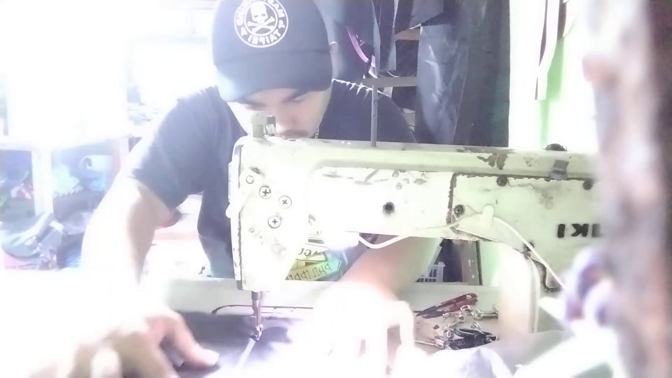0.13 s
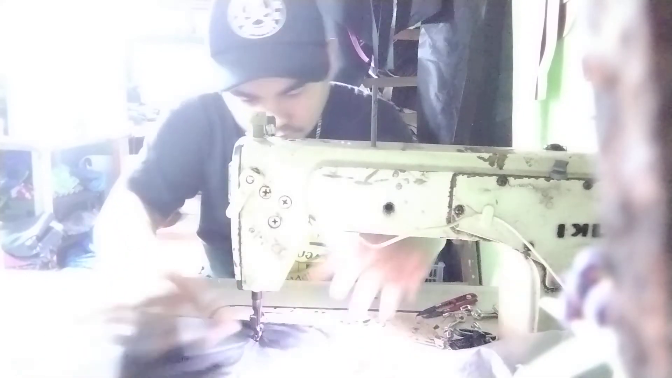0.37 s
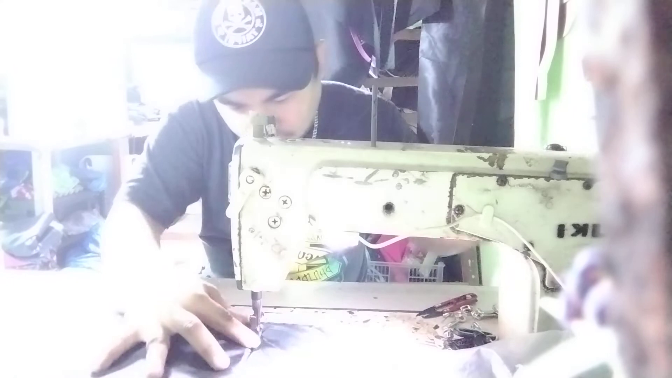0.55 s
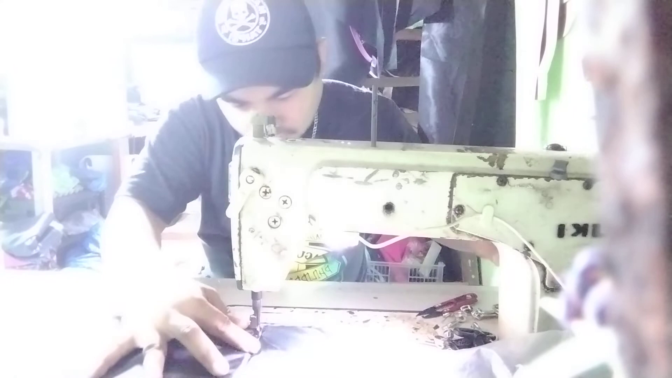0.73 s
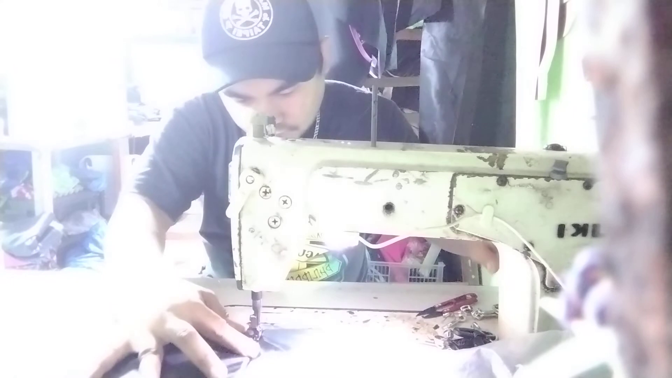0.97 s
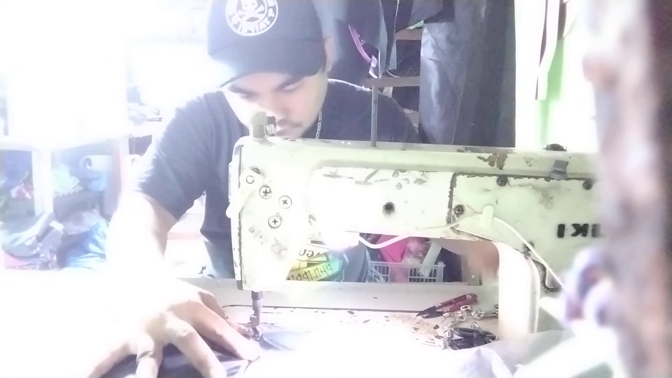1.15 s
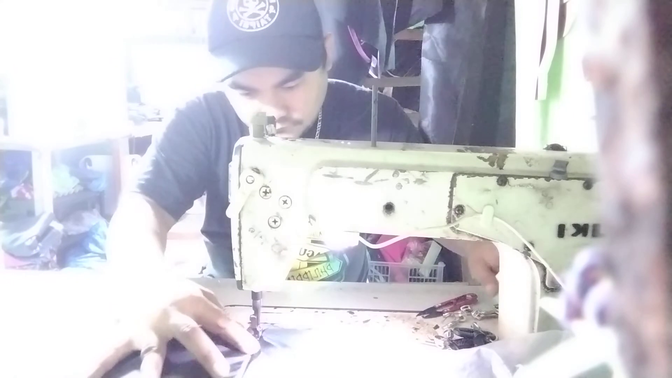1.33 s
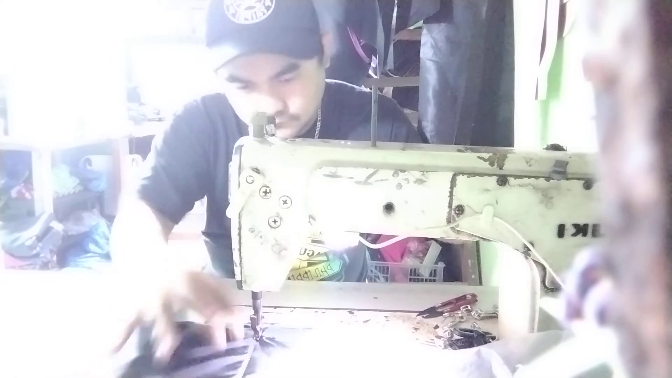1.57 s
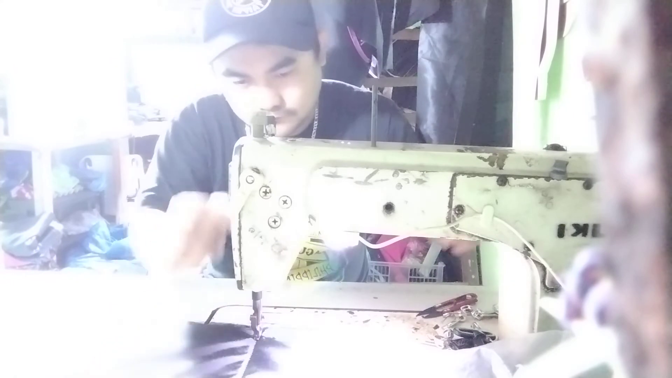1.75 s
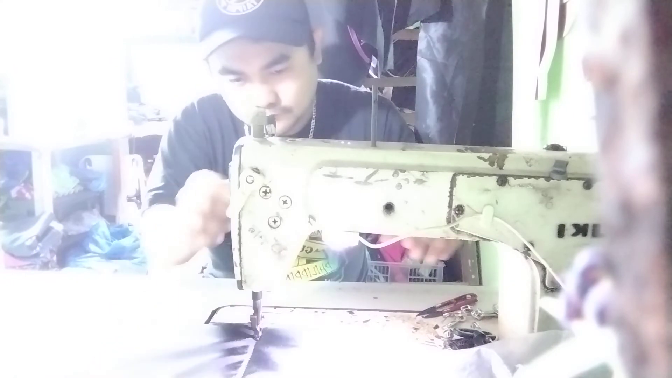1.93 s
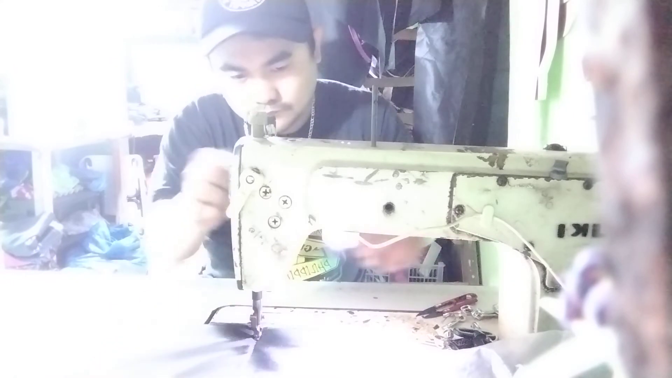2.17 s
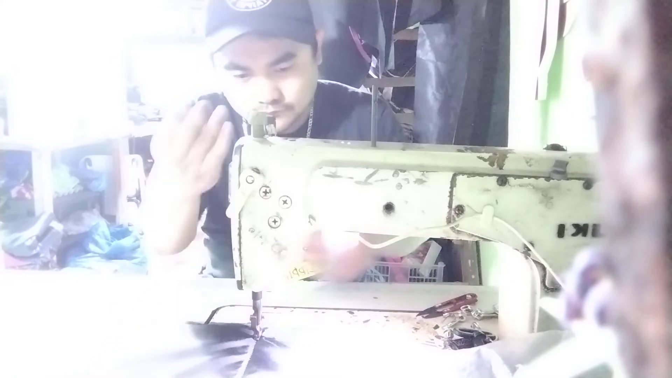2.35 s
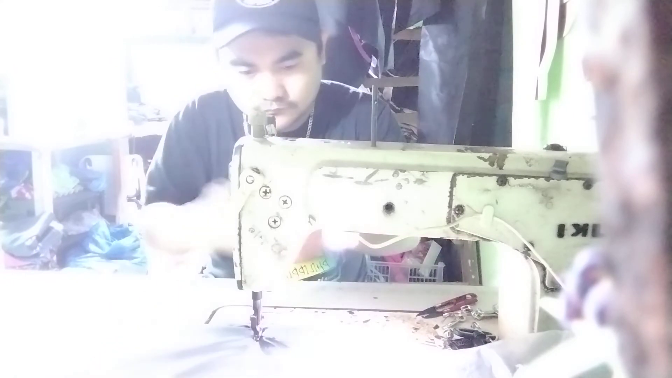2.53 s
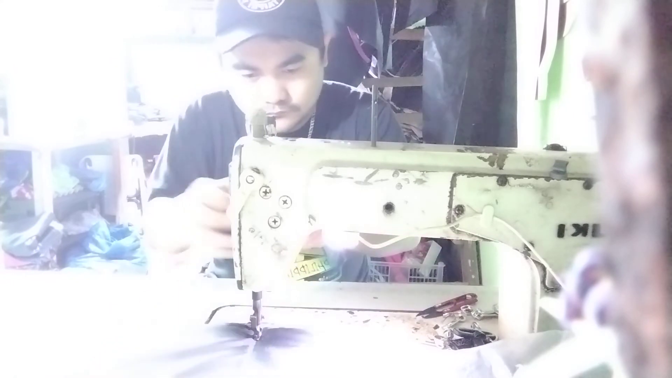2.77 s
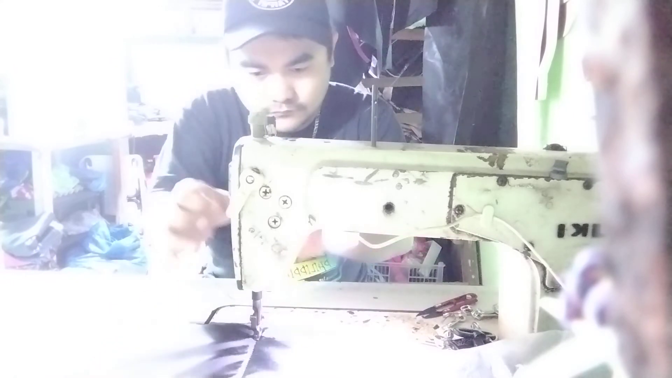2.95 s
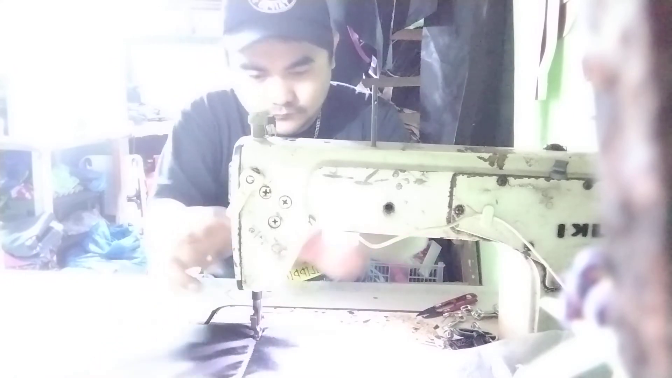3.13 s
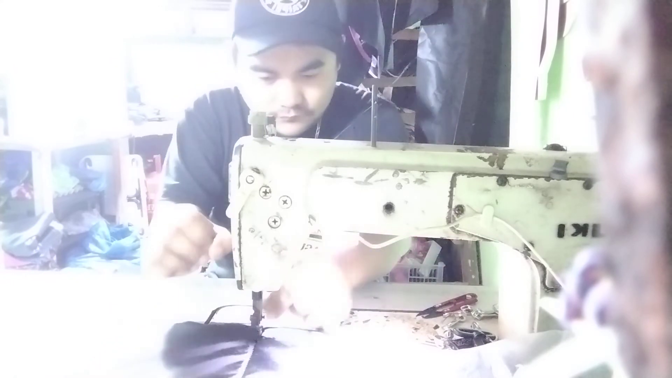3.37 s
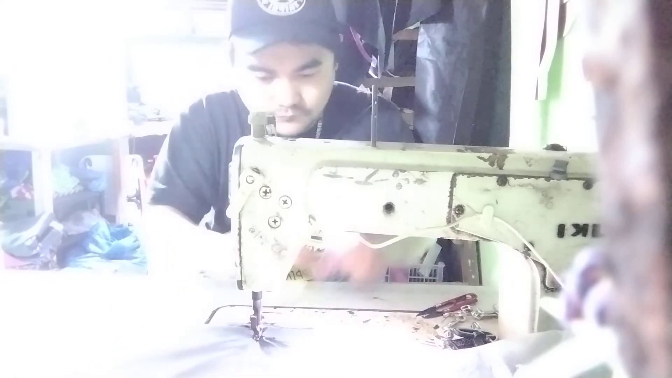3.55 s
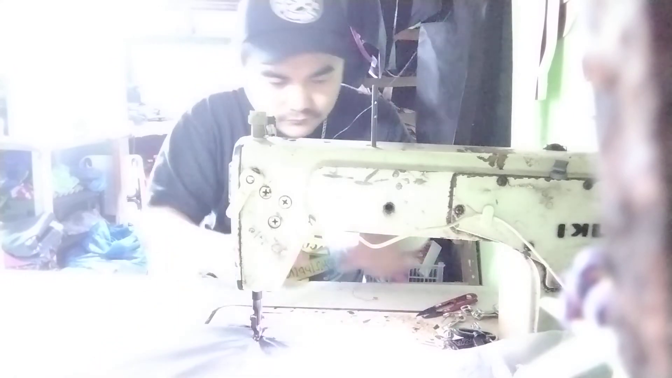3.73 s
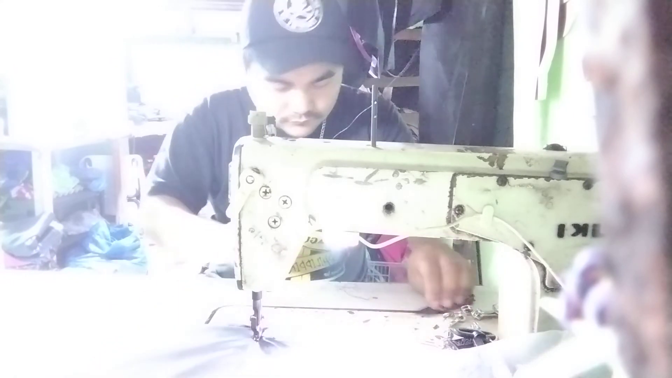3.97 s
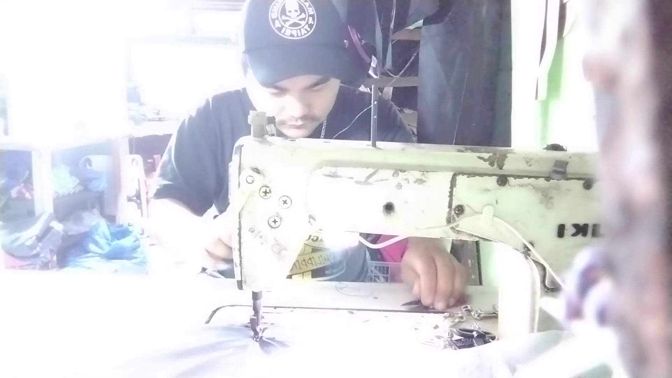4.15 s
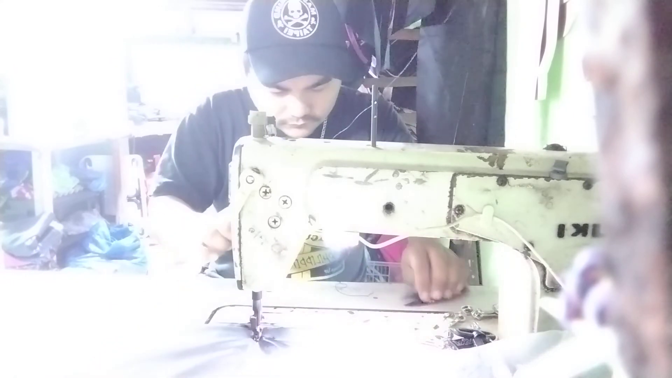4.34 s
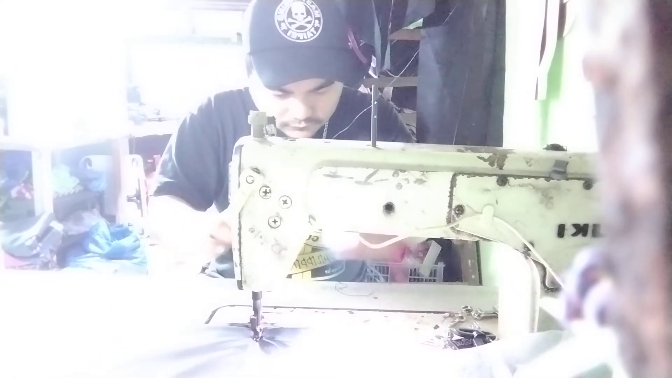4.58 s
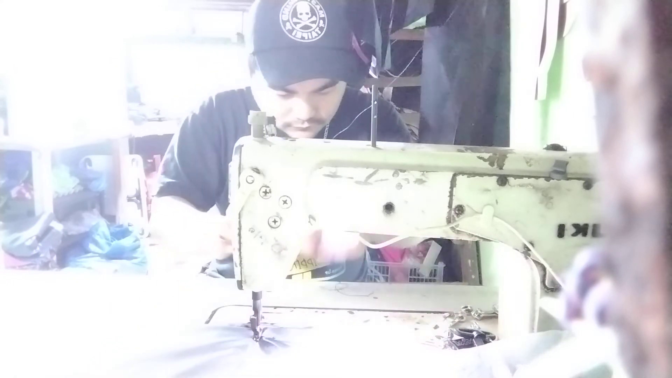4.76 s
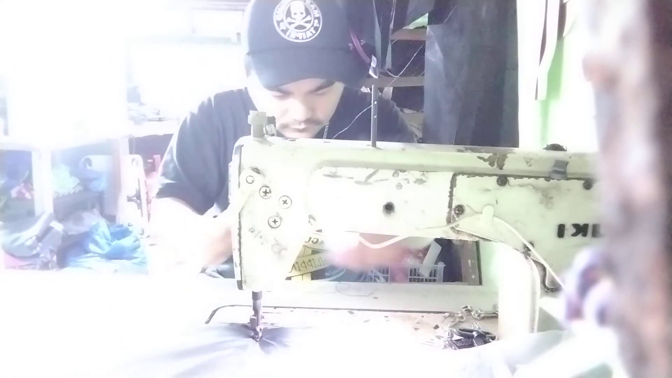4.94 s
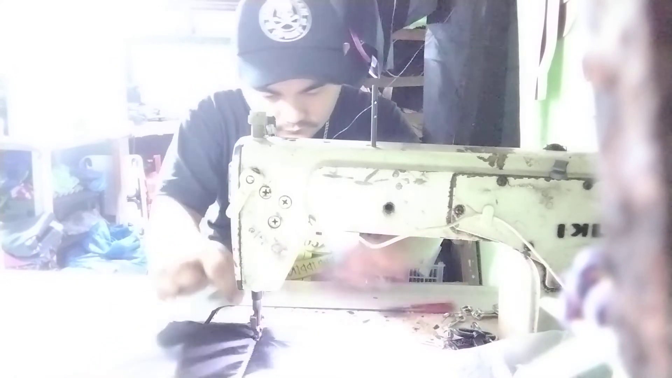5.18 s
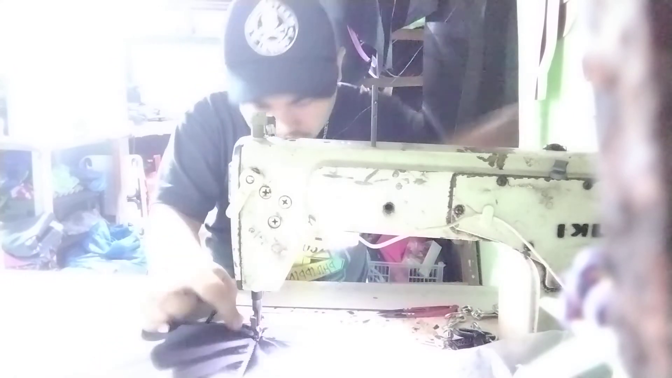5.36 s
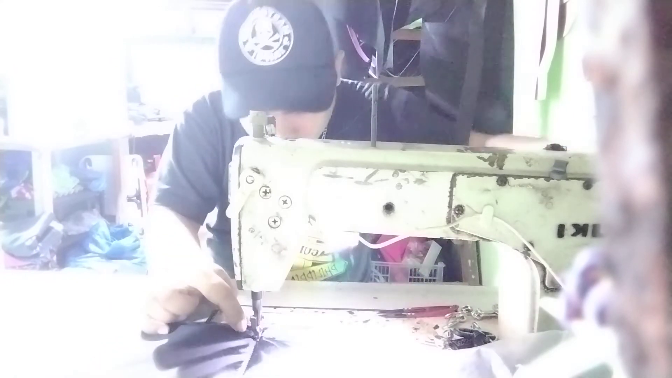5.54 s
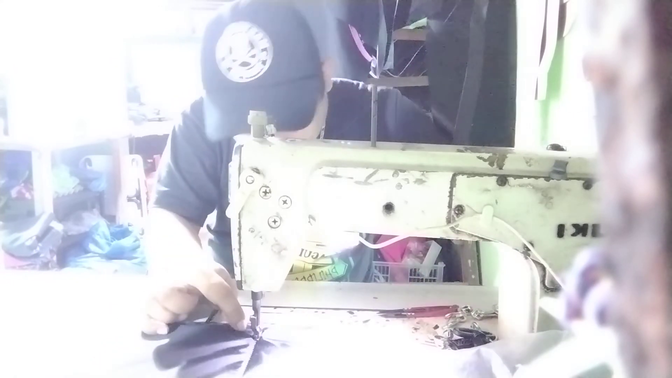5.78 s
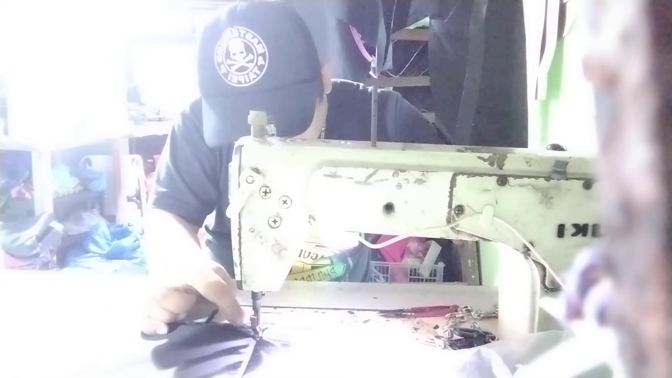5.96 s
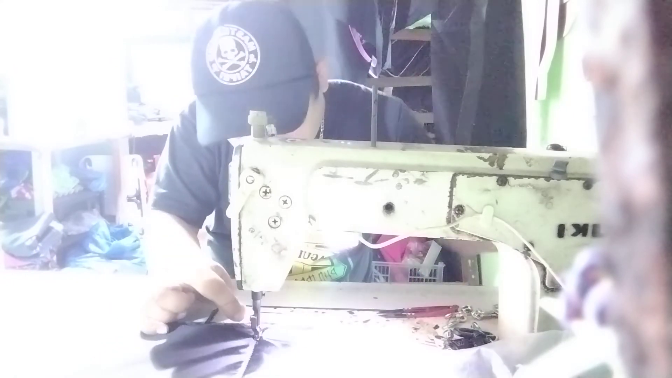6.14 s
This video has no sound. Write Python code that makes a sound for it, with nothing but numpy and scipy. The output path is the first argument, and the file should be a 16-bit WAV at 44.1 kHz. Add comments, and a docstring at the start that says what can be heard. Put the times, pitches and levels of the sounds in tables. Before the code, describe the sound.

A close, mono sound in a small, lightly reverberant workshop. From 0 to 0.2 s an industrial sewing machine runs flat out, about fifty stitches a second, a loud hard metallic buzz over table rumble. It brakes and stops at 0.5 s. After a tiny gap, clacks at 0.69 and 0.76 lead into a slower run, peaking near 0.9 at about half speed, then decelerating into separate ticks and stopping at 1.5, with small lever clacks and a thin fading ring. Then it is quiet: low motor hum, whirr and thin hiss. A faint steady whine lasts from 2 to 5 s, with stronger whines around 2.8-3.1 and 3.4. A paired clack falls at 2.9. Faint blips and cloth rustles follow, clearer at 4.1-4.3 and 4.9. A bright sharp clack comes at 5.2, then rustles at 5.4 and 6.1, a tiny click at 5.67 and soft bumps around 6 s.

```python
"""Industrial sewing machine in a small workshop

A fast run of stitches brakes, a slower run follows and stops: periodic impacts ring the cast head and table,
the swinging linkage adds shaft harmonics, and a thin ring is heard as the shaft comes to rest.
Presser foot and levers clack, short bumps and faint blips sound and the work rustles: shaped noise.
The clutch motor idles throughout as sines and filtered noise, over shaped noise for air and hiss.
"""
import sys
import numpy as np
from scipy import signal
from scipy.fft import rfft, irfft, next_fast_len
from scipy.io import wavfile
from scipy.ndimage import uniform_filter1d, map_coordinates

SR = 44100
rng = np.random.default_rng(int(sys.argv[2]) if len(sys.argv) > 2 else 0)


def file_out(sig):
    """Save sig as 16-bit WAV at sys.argv[1]."""
    # one column per channel
    cols = np.atleast_2d(sig).T
    # limit, then scale
    lim = np.clip(cols, -1, 1)
    pcm = np.round(lim * 32767).astype(np.int16)
    wavfile.write(sys.argv[1], SR, pcm)


N = 273420  # length [samples]

# rotation of the main shaft: (time [s], speed [stitches per second])
SHAFT_SPEED = [(0, 53.9), (.21, 53.9), (.285, 47), (.36, 33), (.41, 17), (.5, 0), (.634, 0), (.694, 17),
               (.81, 28.5), (.88, 29.3), (1.06, 23), (1.2, 17), (1.4, 6), (1.5, 0)]


def amp(db):
    """Level definition: decibels to amplitude gain."""
    return 10 ** (np.asarray(db) / 20)


def unit(x):
    """Power normalisation: scale to rms 1."""
    return x / np.sqrt(np.mean(x ** 2) + 1e-20)


def along(points, hz):
    """Logarithmic frequency scale: interpolate (frequency [Hz], value) points on it."""
    f, value = np.transpose(points)
    return np.interp(np.log(hz + 1), np.log(f + 1), value)


def curve(rows):
    """Linear interpolation: (time [s], value) rows become one value per sample."""
    s, value = np.transpose(rows)
    return np.interp(np.arange(N) / SR, s, value)


def wobble(rate):
    """Band-limited fluctuation: a smooth random curve through normal knots, rate of them a second."""
    knots = rng.standard_normal(int(N * rate / SR) + 4)
    return map_coordinates(knots, [np.arange(N) * rate / SR])


def coloured(x, gain):
    """Minimum-phase filtering: folding the cepstrum makes a causal filter of the given gain."""
    size = 2 * next_fast_len(len(x) // 2 + 2048)
    hz = np.fft.rfftfreq(size, 1 / SR)
    cepstrum = irfft(np.log(np.maximum(gain(hz), 1e-6)), size)
    cepstrum[1:size // 2] *= 2
    cepstrum[size // 2 + 1:] = 0
    response = np.exp(rfft(cepstrum))
    return irfft(rfft(x, size) * response, size)[:len(x)]


def resonances(modes, hz):
    """Modal superposition: power sum of (centre [Hz], half-power width [Hz], level [dB]) resonances."""
    return np.sqrt(sum(amp(db) ** 2 / (1 + ((hz - centre) / (width / 2)) ** 2) for centre, width, db in modes))


def noise(spectrum):
    """Spectral shaping: noise of rms 1 with a (frequency [Hz], level [dB]) spectrum."""
    return unit(coloured(rng.standard_normal(N), lambda hz: amp(along(spectrum, hz))))


def strike(gain, rise, t60):
    """Impact excitation: a noise burst (rise constant and t60 in s) filtered by gain, near rms 1 at its height."""
    t = np.arange(SR // 2) / SR
    shape = (1 - np.exp(-t / max(rise, 1e-4))) ** 2 * amp(-60 * t / t60)
    ring = coloured(rng.standard_normal(len(t)) * shape, gain)
    return unit(ring) * np.sqrt(np.mean(shape ** 2)) / shape.max()


def add(track, s, sound):
    """Linear superposition: mix a sound into the track at s seconds."""
    part = track[round(s * SR):][:len(sound)]
    part += sound[:len(part)]


def swell(start, end, db, attack, t60):
    """Growth and decay: gain that rises to db at start, holds until end and dies away exponentially."""
    t = np.arange(N) / SR
    growth = np.exp(-(np.minimum(t - start, 0) / attack) ** 2)
    return amp(db - 60 * np.maximum(t - end, 0) / t60) * growth


def room(x, wet_db):
    """Reverberation: convolution with exponentially decaying noise whose decay time depends on frequency."""
    # decay of the workshop: (frequency [Hz], t60 [s])
    decay_times = [(150, 0.52), (1500, 0.42), (4000, 0.24), (12000, 0.24)]
    hz, _, z = signal.stft(rng.standard_normal(SR // 2), SR, nperseg=256)
    t = np.linspace(0, .5, z.shape[1])
    decay = amp(-60 * t / along(decay_times, hz)[:, None])
    tail = signal.istft(z * decay, SR, nperseg=256)[1]
    tail /= np.linalg.norm(tail)
    return x + amp(wet_db) * signal.fftconvolve(x, tail)[:N]


def effort(speed):
    """Load dependence: gains [dB] of clatter and rumble grow with speed, thick work and braking."""
    # the needle labours where the work is thick: (start [s], end [s], extra clatter [dB])
    thick_work = [(0.313, .335, 5), (0.805, 0.881, 3), (1.054, 1.1, 2)]
    thick_edge_s = 0.014
    # gain at full speed, and its loss each time the speed halves
    steel_db, steel_halving_db = -20.5, 9
    rumble_db, rumble_halving_db = -31.5, 10
    brake_db, brake_rate = 11, 215  # limit of the change [dB], its scale [stitches per second, per second]
    t = np.arange(N) / SR
    halvings = -np.log2(np.maximum(speed / speed.max(), .01))
    load_db = sum(db * np.exp(-((t - np.clip(t, start, end)) / thick_edge_s) ** 2)
                  for start, end, db in thick_work)
    acceleration = uniform_filter1d(np.gradient(speed) * SR, size=2048)
    braking = -np.tanh(acceleration / brake_rate)  # negative, so quieter, while speeding up
    clatter_db = steel_db - steel_halving_db * halvings + load_db
    return clatter_db, rumble_db - rumble_halving_db * halvings + brake_db * braking


def stitching(ring_t60=0.03, ring_rise=0.00037, rattle_turn=0.34, rattle_db=-1.5, scatter_db=2.63,
              modes_db=8, table_t60=0.12, belt_db=-3, bearing_db=-14, low_hz=85, jitter_s=.00009):
    """Periodic impact excitation: each shaft turn repeats steel contacts that ring head and table."""
    # needle bar, hook, feed dog, take-up lever: (phase [share of a turn], level [dB])
    contacts = [(.63, -5.5), (.8, -11.5), (0.13, -13), (0.31, -13.5)]
    # cast-iron head: (frequency [Hz], gain [dB])
    head_gain = [(200, -25.5), (350, -1.5), (550, -3.5), (690, -8), (900, -1.5), (1150, -6.5), (1330, 0),
                 (1600, -7.5), (1900, 1), (2350, -10), (3300, -11), (5600, -26.5), (9900, -18),
                 (15000, -38.5)]
    # ringing of the head: (centre [Hz], width [Hz], level before modes_db [dB])
    head_modes = [(1330, 180, -5.5), (1564, 95, 2), (1850, 360, -17), (2500, 37, -4), (2950, 340, -5.5)]
    # table top: (frequency [Hz], gain before the low cut [dB])
    table_gain = [(24, -43), (40, -37), (54, -2.5), (97, 2.5), (172, 3.5), (222, -8.5), (358, -2),
                  (418, -14), (460, -3), (700, -5), (910, -19), (1540, -120)]
    speed = curve(SHAFT_SPEED)
    clatter_db, rumble_db = effort(speed)
    turns = np.cumsum(speed) / SR
    pace, running = speed / speed.max(), np.tanh(speed / 5)
    t = np.arange(SR // 4) / SR
    head_decay = (1 - np.exp(-t / ring_rise)) * amp(-60 * t / ring_t60)
    table_decay = amp(-60 * t / table_t60)
    steel, wood, play = np.zeros((3, N))
    for share, db in contacts:
        at = np.flatnonzero(np.diff(np.floor(turns - share)))
        shift = np.round(jitter_s * SR * rng.standard_normal(len(at))).astype(int)  # bearing play
        at = np.clip(at + shift, 0, N - 1)
        blows = np.zeros(N)
        blows[at] = amp(db + scatter_db * rng.standard_normal(len(at)))
        head_ring = rng.standard_normal(len(t)) * head_decay
        table_ring = rng.standard_normal(len(t)) * table_decay
        steel += signal.fftconvolve(blows * np.sqrt(pace), head_ring)[:N]
        wood += signal.fftconvolve(blows / np.sqrt(speed + 10), table_ring)[:N]
        play += amp(db) * np.exp(-((turns - share) % 1) / rattle_turn)
    # loose joints rattle after each contact, dying away over a share of the turn
    rattle = amp(rattle_db) * unit(running * play * rng.standard_normal(N))
    # bearings and belt rub for as long as the shaft turns
    bearings = amp(bearing_db) * unit(running * rng.standard_normal(N))
    belt = amp(belt_db) * unit(running * rng.standard_normal(N))

    def head(hz):
        return amp(along(head_gain, hz)) * (1 + amp(modes_db) * resonances(head_modes, hz))

    def table(hz):
        return amp(along(table_gain, hz)) / (1 + (low_hz / (hz + 1)) ** 4)

    steel = coloured(unit(steel) + rattle + bearings, head)
    wood = coloured(unit(wood) + belt, table)
    clatter = room(amp(clatter_db) * unit(steel), wet_db=-9.5)
    rumble = room(amp(rumble_db) * unit(wood), wet_db=-5)
    return np.sqrt(np.mean(running ** 2)) * (clatter + rumble)


def linkage(steepness=6):
    """Unbalanced rotation: the linkage shakes the frame at shaft multiples, fading fast as speed drops."""
    # harmonics of the shaft: (multiple of its rate, mean level at full speed [dB])
    harmonics = [(2, -37.5), (6, -31.5), (7, -54), (8, -45), (9, -47), (10, -31), (14, -41), (17, -41),
                 (19, -41)]
    speed = curve(SHAFT_SPEED)
    turns = np.cumsum(speed) / SR
    tones = sum(amp(db + wobble(33)) * np.sin(2 * np.pi * (k * turns + rng.random())) for k, db in harmonics)
    return np.sqrt(2) * tones * (speed / speed.max()) ** steepness


def run_down(attack_s=.14, t60=0.82):
    """Narrow-band resonance: a thin metallic ring of steadied envelope hangs on as the shaft comes to rest."""
    # resonances, whose gain is squared below: (centre [Hz], width [Hz], level [dB])
    ring_modes = [(1003, 34, 11.5), (1803, 78, 4.5), (1926, 27, 5)]
    # full strength: (start [s], end [s], level [dB])
    ring_swell = (1.07, 1.63, -47)
    ring = coloured(rng.standard_normal(N), lambda hz: resonances(ring_modes, hz) ** 2)
    power = np.abs(uniform_filter1d(ring ** 2, size=2048))
    steadied = ring / np.sqrt(power + 1e-12)
    return swell(*ring_swell, attack_s, t60) * steadied


def clacks(ring_db=-9, thud_db=-15.0, click_db=-16, bright_db=3, dull_db=3, modes_db=6,
           click_life=0.39, thud_life=1.02, thud_top_hz=1400):
    """Contact stiffness: steel stops click, ring the presser bar and thud; quicker contacts are brighter."""
    # presser foot and levers: (time [s], level before the gains of the parts [dB], rise constant [s], t60 [s])
    stops = [(.686, -23.5, 0.00277, .06), (.7624, -13, 0.00033, 0.014), (.851, -24, 0.00072, .08),
             (1.5, -34.5, .001, 0.076), (1.535, -31.5, .001, 0.063), (1.586, -24, 0.0011, 0.048),
             (2.87, -23.5, .0027, .13), (2.886, -23, 0.00251, 0.11), (2.996, -38, .005, 0.034),
             (5.171, -21.5, 0.00072, 0.019), (5.198, -12.5, 0.00043, 0.051), (5.218, -23, .00012, .025),
             (5.277, -25.5, .001, 0.085)]
    # presser foot: (frequency [Hz], gain [dB])
    foot_gain = [(150, -60), (250, -13), (466, 5.5), (705, 7), (1050, 6.5), (1180, 5.5), (1530, 2.5),
                 (2130, 2.5), (2660, -1), (2950, 1.5), (3630, -12), (4960, -13), (5890, -12), (10100, -8),
                 (15500, -29)]
    # presser bar: (centre [Hz], width [Hz], level before modes_db [dB])
    bar_modes = [(448, 23, -4), (864, 11, 0), (1017, 35, 0.5), (1580, 140, -2), (1824, 21, -11),
                 (2150, 12, 4), (2290, 32, -21), (2870, 96, -12)]
    # bright edge of a clack: (frequency [Hz], gain [dB])
    edge_gain = [(4500, 15), (6000, -5.5), (9500, 15.5), (11500, 7.5), (15000, 4.5)]
    rebound_s, rebound_loss_db = .018, 13.5  # chatter: time between rebounds, loss at each

    def steel(hz):
        return amp(along(foot_gain, hz)) * (1 + amp(modes_db) * resonances(bar_modes, hz))

    def edge(hz):
        return amp(along(edge_gain, hz))

    def band(gain, lo_hz, hi_hz):
        return lambda hz: gain(hz) / (1 + (lo_hz / (hz + 1)) ** 6 + (hz / hi_hz) ** 6)

    out = np.zeros(N)
    for s, db, rise, t60 in stops:
        start = s - rise / 2
        hardness = np.log2(.001 / rise)  # octaves quicker than a rise of 1 ms
        ring = strike(band(steel, 1390, 6800), rise, t60)
        thud = strike(band(steel, 230, thud_top_hz), 2 * rise, t60 * thud_life)
        add(out, start, amp(db + ring_db) * ring)
        add(out, start, amp(db + thud_db - dull_db * hardness) * thud)
        for k in range(3):
            click = strike(band(edge, 4000, SR / 2), rise / 2, t60 * click_life)
            level_db = db + click_db + bright_db * hardness - k * rebound_loss_db
            add(out, start + k * rebound_s, amp(level_db) * click)
    return room(out, wet_db=-6.5)


def chance_blips(count=10, level_db=-50, spread_db=3, pitch_hz=1216, spread_octaves=1.11, width=0.075, t60=0.1):
    """Random short tones: faint narrow-band blips at chance times and pitches, as rows of short bursts."""
    # span of the blips: (first time [s], last time [s])
    first, last = (2.0, 6.2)
    rows = []
    for when, size, pitch in rng.random((count, 3)):
        s = first + (last - first) * when
        db = level_db + spread_db * (2 * size - 1)
        centre_hz = pitch_hz * 2 ** (spread_octaves * (2 * pitch - 1))
        rows.append((s, db, centre_hz, width, t60))
    return rows


def short_bursts(rise_share=.09, level_db=-7):
    """Band-limited bursts: faint blips and bumps, each in its own band; longer ones swell more slowly."""
    # short bursts: narrow blips, handling bumps, and extra ringing of the machine's runs:
    # (time [s], level before level_db [dB], pitch [Hz], half-width [octaves], t60 [s])
    burst_rows = [(.411, -35.5, 1316, 0.11, .46), (.449, -38, 255, 0.9, 0.42),
                  (0.579, -29.5, 784, 0.9, 0.14), (.586, -35, 2295, 0.071, 0.14),
                  (.673, -31, 1224, 0.09, .11), (.685, -32.5, 367, 0.97, .17), (.8, -22.5, 1273, 0.12, .25),
                  (.822, -21.5, 465, 0.46, .13), (1.14, -28.5, 255, 0.22, 0.22),
                  (1.21, -30, 185, 0.41, 0.15), (1.5, -38, 894, 0.31, .22),
                  (1.538, -35.5, 2230, 0.12, 0.073), (1.73, -42, 1265, 0.091, .12),
                  (2.145, -41, 1024, 0.087, 0.16), (2.296, -40.5, 430, 0.22, .097),
                  (2.647, -41, 2640, 0.09, 0.11), (3.555, -44, 697, 0.09, .076),
                  (3.745, -39.5, 434, 0.13, .13), (3.819, -45.5, 717, 0.074, 0.34),
                  (4.015, -37.5, 1434, 0.25, 0.19), (4.268, -25.5, 1517, 0.22, .065),
                  (4.817, -33.5, 943, 0.27, 0.11), (4.908, -27, 3150, 0.27, .015),
                  (5.37, -37.5, 1290, 0.81, .13), (5.567, -40.5, 435, 0.15, .11),
                  (5.569, -46, 1640, 0.029, .14), (5.647, -48, 995, .053, .23),
                  (5.672, -17, 1750, 0.16, .0097), (5.944, -25, 576, 0.48, 0.1007),
                  (5.95, -30, 1220, 0.74, .075), (6.034, -28, 663, 0.19, .065),
                  (6.042, -38.5, 907, .17, 0.31)]
    out = np.zeros(N)
    for s, db, pitch_hz, octaves, t60 in list(burst_rows) + chance_blips():
        band = lambda hz: 1 / (1 + (np.log2((hz + 1) / pitch_hz) / octaves) ** 4) + 1e-4
        rise = rise_share * t60
        add(out, s - rise, amp(db + level_db) * strike(band, rise, t60))
    return room(out, wet_db=-7)


def cloth(level_db=-1, rest_db=-72, push_s=0.037):
    """Friction noise: the work rustles unevenly, swelling with each push over the bed."""
    # pushes: (time [s], level before level_db [dB])
    pushes = [(2.03, -59.5), (2.95, -67), (3.6, -65), (4.14, -54.5), (4.3, -57), (4.88, -56), (5.39, -50),
              (6.08, -50.5)]
    # rustle: (frequency [Hz], level [dB])
    rustle_spectrum = [(500, -76), (1500, -45), (2500, -5), (2850, 6), (3500, -3.5), (4600, -10),
                       (7000, -15), (15000, -47)]
    t = np.arange(N) / SR
    pushing = amp(rest_db) + sum(amp(db) * np.exp(-((t - s) / push_s) ** 2) for s, db in pushes)
    folds = amp(4 * wobble(60))
    return amp(level_db) * pushing * unit(folds * noise(rustle_spectrum))


def motor(rotation_hz=59.73, waver_db=1.3, sideband_db=-10, whirr_db=-61, whine_attack_s=.03, whine_t60=0.47):
    """Harmonics of rotation: the idling clutch motor hums, whines with one sideband, and whirrs."""
    # steady hum: (multiple of the rotation, mean level [dB rms])
    hum_tones = [(2, -75.5), (3, -81.5), (4, -74), (20, -76.5), (24, -96), (25, -83), (28, -82.5)]
    # tones that swell for a while: (start [s], end [s], level [dB rms], multiple of the rotation)
    whine_swells = [(1.95, 5.15, -62.5, 20), (2.74, 3.05, -49.5, 23), (3.35, 3.477, -50, 23)]
    # motor housing, whose gain is squared below: (centre [Hz], width [Hz], level [dB])
    housing_modes = [(419.6, 57, -1), (1164, 77, -0.5), (1428, 17.5, 0.5), (2866, 20, -18),
                     (3350, 600, -8.5)]
    turns = np.cumsum(rotation_hz * (1 + 0.00077 * wobble(4.85))) / SR

    def tone(k):
        waver = amp(waver_db * wobble(6.2))
        return np.sqrt(2) * waver * np.sin(2 * np.pi * (k * turns + rng.random()))

    hum = sum(amp(db) * tone(k) for k, db in hum_tones)
    whine = np.zeros(N)
    for start, end, db, k in whine_swells:
        pair = tone(k) + amp(sideband_db) * tone(k + 1)
        whine += swell(start, end, db, whine_attack_s, whine_t60) * pair
    whirr = unit(coloured(rng.standard_normal(N), lambda hz: resonances(housing_modes, hz) ** 2))
    return hum + whine + amp(whirr_db + 3.07 * wobble(7.4)) * whirr


def background(air_db=-69, hiss_db=1.5, ripple_db=4.0, top_hz=11500, top_swing=0.67, top_db=4.0):
    """Stationary and modulated noise: still air under a finely rippled hiss that dulls as it sinks."""
    # room air: (frequency [Hz], level [dB])
    air_spectrum = [(24, -42), (40, -24), (65, -9), (113, -7.5), (193, -1), (240, -9.5), (302, -2),
                    (417, 0.5), (659, -2.5), (1000, -12), (1300, -66), (2200, -120)]
    # hiss: (frequency [Hz], level before ripple and treble gain [dB])
    hiss_spectrum = [(300, -75), (1500, -15.5), (2500, -17), (2860, 0), (3200, -1), (4400, -8),
                     (5700, -10.5), (6300, -7), (7000, -12.5), (8400, -11), (9860, 2), (11300, -12.5),
                     (13300, -18.5), (15000, -20.5)]
    # slow course of the hiss: (time [s], level before hiss_db [dB])
    hiss_course = [(1.6, -55.5), (1.71, -58.5), (2.92, -57), (3.3, -62.5), (3.78, -58), (4.05, -54.5),
                   (5.88, -52.5), (6.2, -54)]
    level_db = curve(hiss_course)
    # random narrow peaks, one knot each 40 Hz
    ripple = lambda hz: amp(ripple_db * map_coordinates(rng.standard_normal(600), [hz / 40]))
    hiss = unit(coloured(noise(hiss_spectrum), ripple))
    high_pass = signal.butter(4, top_hz, "high", fs=SR, output="sos")
    top = signal.sosfiltfilt(high_pass, hiss)
    top_gain = amp(top_db + top_swing * (level_db - level_db.max()))
    hiss = hiss - top + top_gain * top
    return amp(air_db) * noise(air_spectrum) + amp(level_db + hiss_db) * hiss


def scene():
    """Superposition of machine, short sounds and background, in one channel."""
    machine = stitching() + linkage() + run_down()
    short_sounds = clacks() + short_bursts() + cloth()
    return (machine + short_sounds + motor() + background())[None]


def record(dry):
    """Band limitation: an ideal low-pass keeps nothing above its cutoff."""
    top_hz = 15700
    size = next_fast_len(N + SR // 2)
    passed = np.fft.rfftfreq(size, 1 / SR) < top_hz
    return irfft(rfft(dry, size) * passed, size)[:, :N]


dry = scene()
out = record(dry)
file_out(out)
```